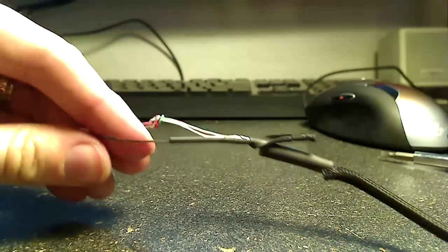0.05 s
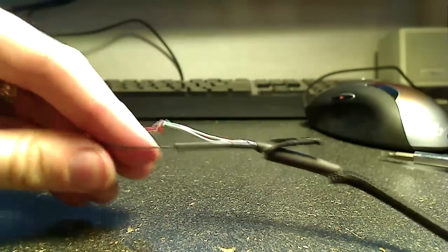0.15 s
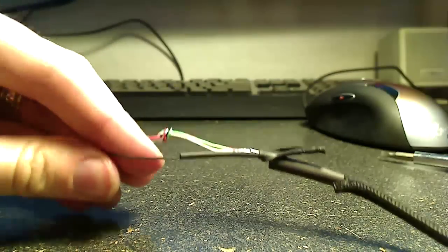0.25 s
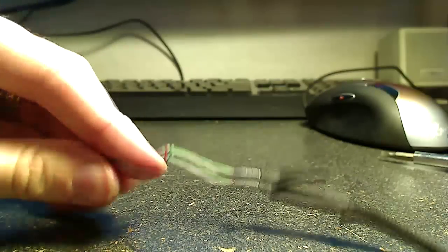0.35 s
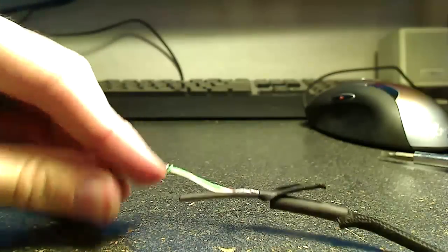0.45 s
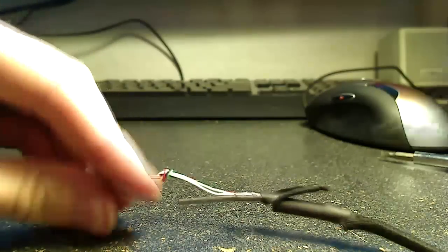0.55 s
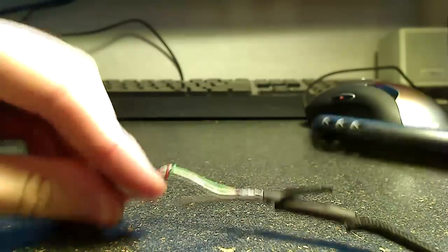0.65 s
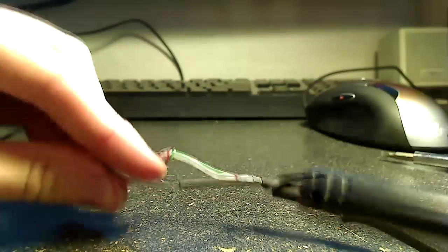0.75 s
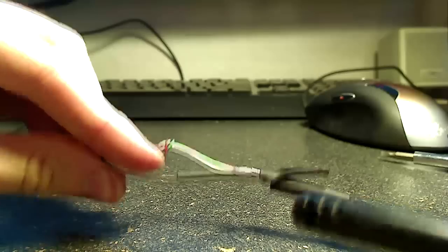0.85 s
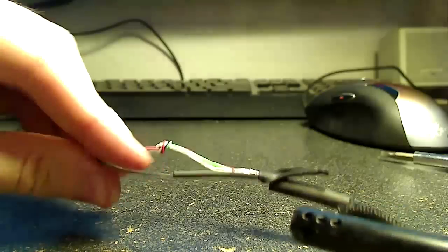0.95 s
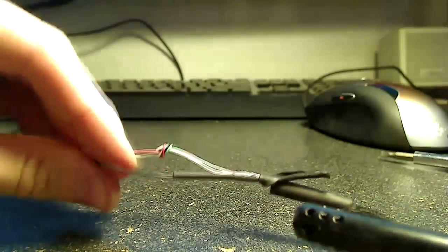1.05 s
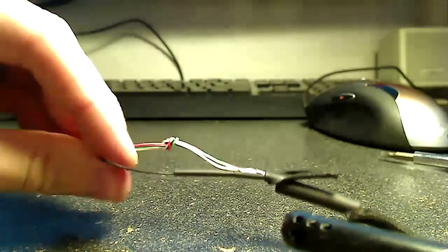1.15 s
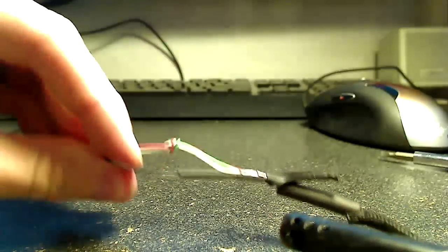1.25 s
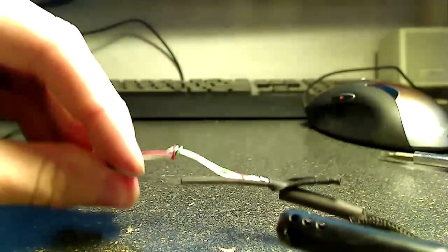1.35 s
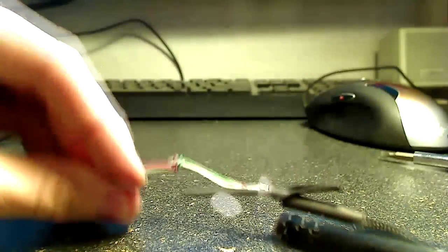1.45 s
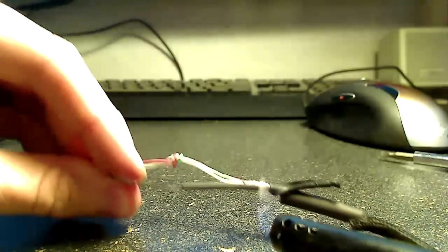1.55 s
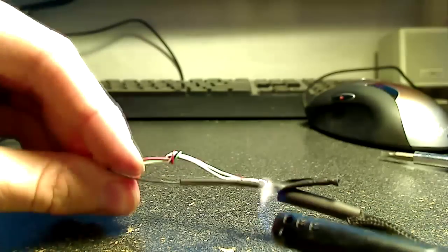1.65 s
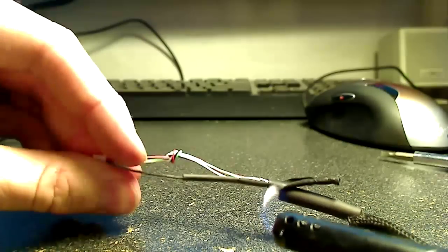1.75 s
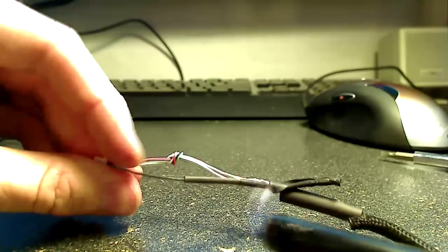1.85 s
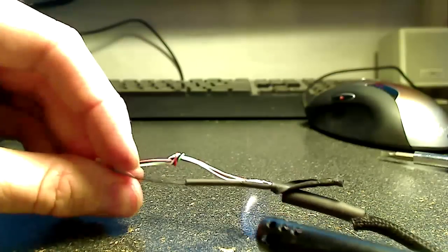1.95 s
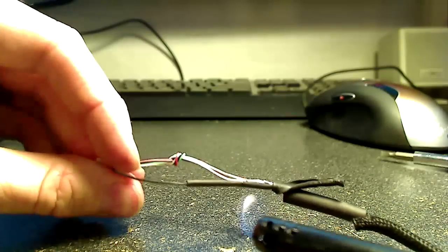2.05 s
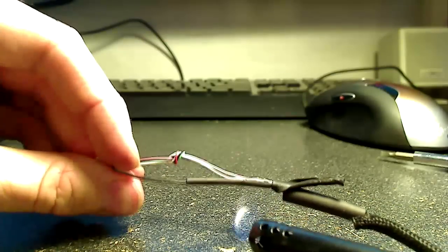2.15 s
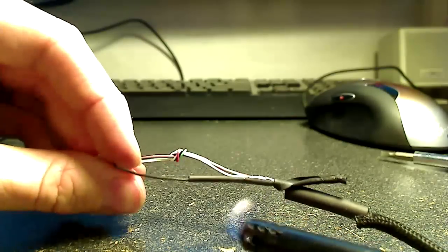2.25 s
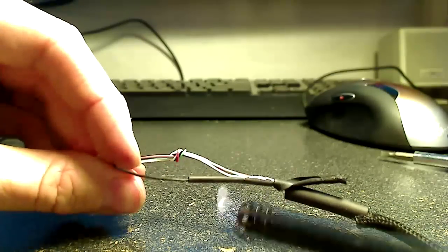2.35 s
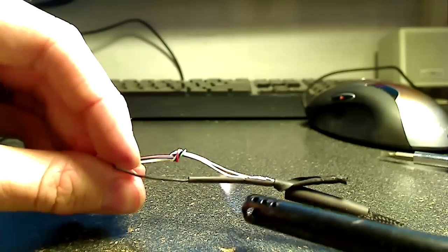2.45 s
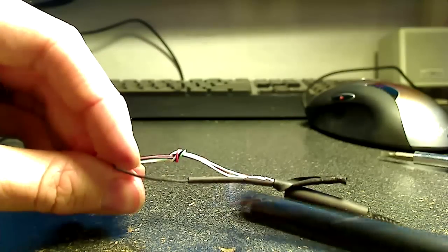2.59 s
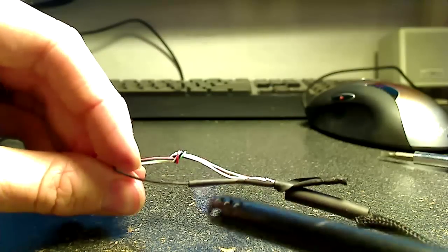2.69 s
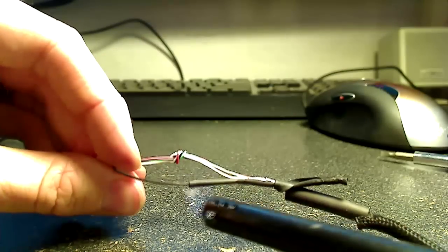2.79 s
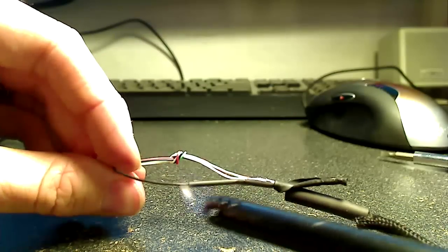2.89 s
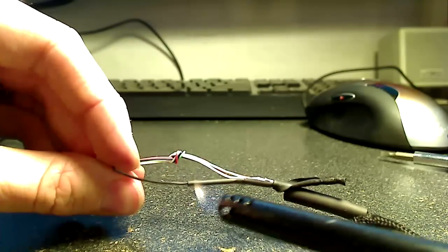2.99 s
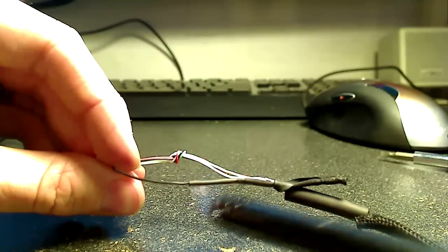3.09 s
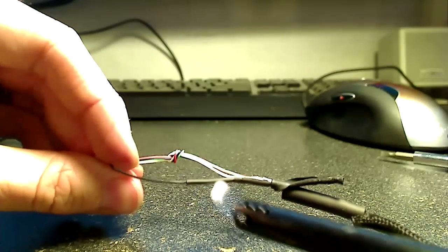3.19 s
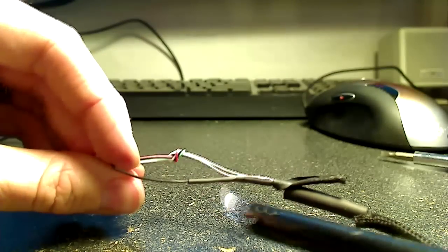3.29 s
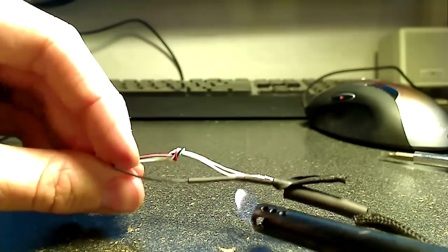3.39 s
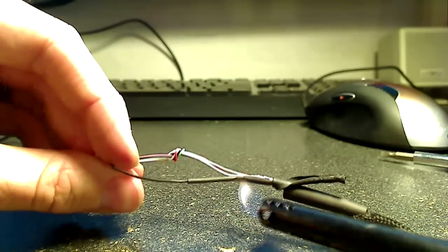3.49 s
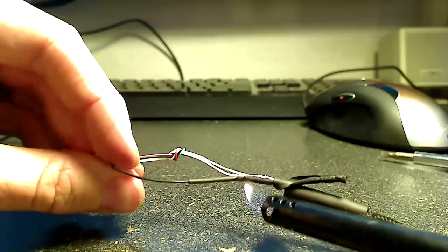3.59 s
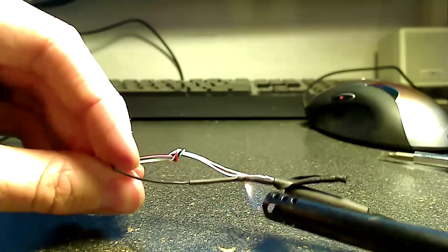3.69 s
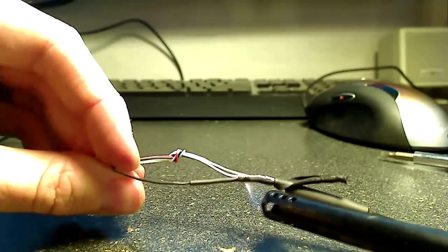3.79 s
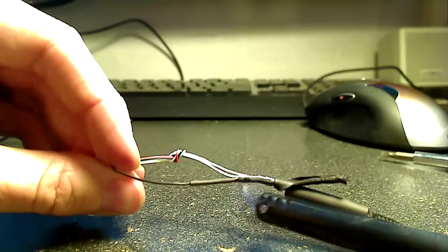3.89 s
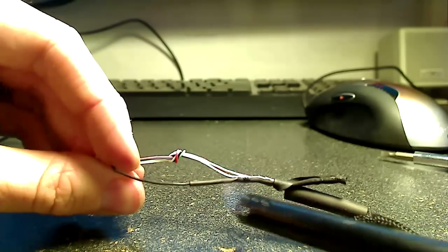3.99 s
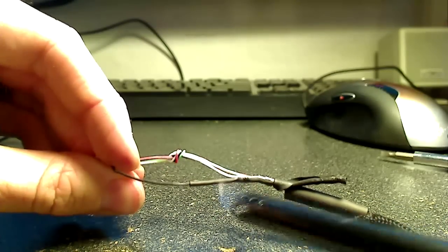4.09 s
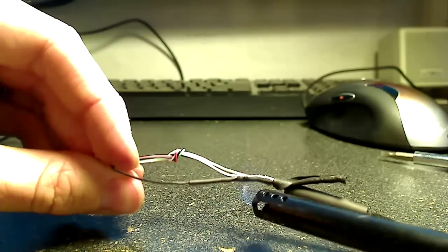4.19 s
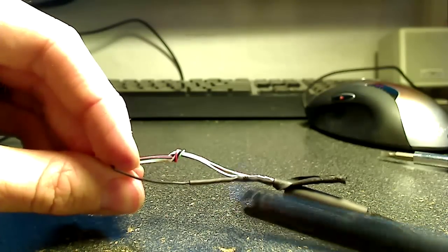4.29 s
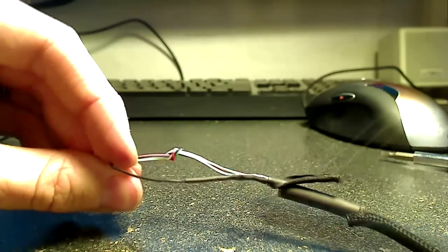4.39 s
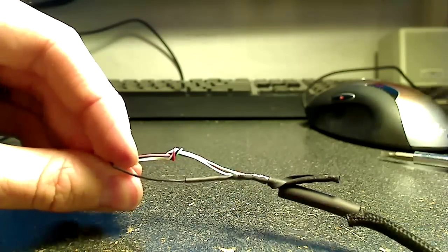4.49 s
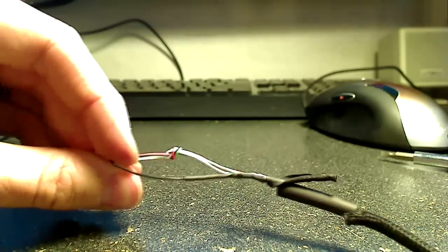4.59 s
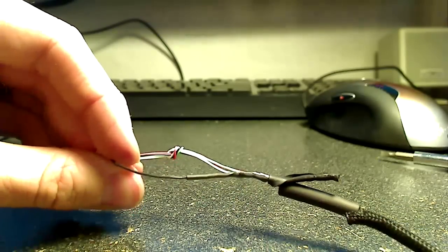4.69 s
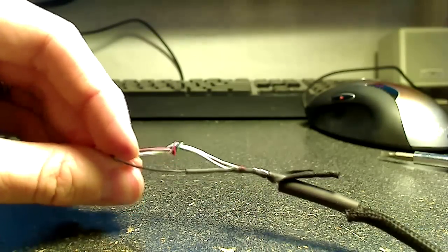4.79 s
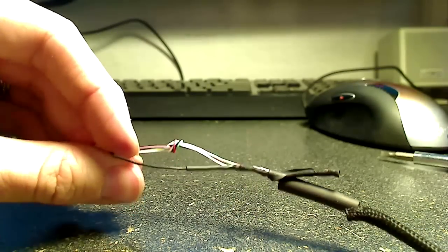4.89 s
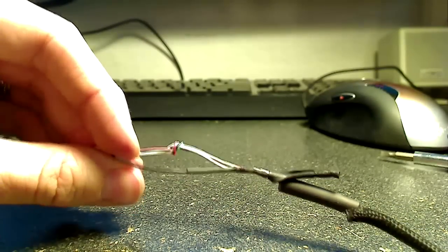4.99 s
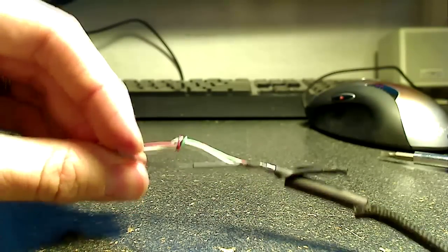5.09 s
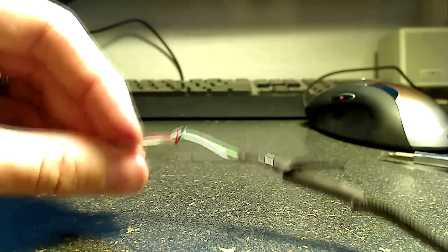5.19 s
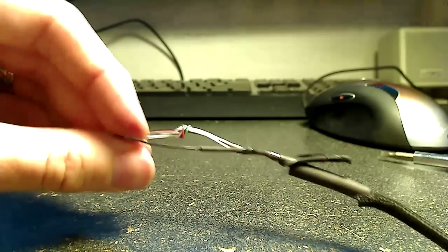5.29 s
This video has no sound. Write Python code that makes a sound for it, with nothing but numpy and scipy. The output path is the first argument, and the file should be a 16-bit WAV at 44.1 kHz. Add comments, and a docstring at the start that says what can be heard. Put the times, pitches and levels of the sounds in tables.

```python
"""A computer hums and whines faintly in a small room, while fingers rub a cable and bump the desk.
Close to a small microphone, a long-necked gas lighter is worked to shrink tubing on the spliced cable.
Its trigger ticks, exciting the modes of the plastic casing; the piezo hammer snaps, ringing the metal
neck, and the gas catches with a low puff. Later the trigger springs back and the lighter is put down:
an impact on the desk, a brief chatter of contacts and a squeak of friction."""
import sys
import numpy as np
from scipy import signal
from scipy.fft import rfft, irfft
from scipy.io import wavfile
from scipy.ndimage import uniform_filter1d, map_coordinates

SR = 44100
rng = np.random.default_rng(int(sys.argv[2]) if len(sys.argv) > 2 else 0)


def bounce(signal):
    """Save signal as a 16-bit WAV file at the path given by the first command-line argument."""
    frames = np.transpose(np.atleast_2d(signal))
    limited = np.clip(frames, -1, 1)
    pcm = np.round(limited * 32767).astype(np.int16)
    wavfile.write(sys.argv[1], SR, pcm)


N = 235708
SIZE = 16384  # samples in one short sound
AGE = np.arange(SIZE) / SR  # its time axis in seconds
HZ = np.fft.rfftfreq(SIZE, 1 / SR)

# Reverberation of the room. Each row: frequency in Hz, time to decay by 60 dB in seconds.
ROOM_DECAY = [(100, 0.11), (300, 0.1), (1000, 0.11), (3000, 0.12), (6000, 0.13), (10000, 0.1),
              (16000, 0.099)]
# Electronic tones. Each row: frequency in Hz, level in dB, half the depth of the dips as a fraction.
WHINES = [(1830, -81.5, .3), (3658, -91, .35), (4732, -96.5, .3), (6070, -103, .3), (7101, -101, .3),
          (7321, -94, .45), (9152, -104, .3), (9475, -101, .3), (10982, -104, .3), (11838, -102, .3)]

# Spectral envelopes. Each row: frequency in Hz, relative level in dB.
FAN_SPECTRUM = [(20, -44.5), (60, -23.5), (125, -9), (240, -5.5), (320, -12.5), (440, -14), (540, -13.5),
                (1000, -22), (1500, -27), (2950, -33), (3400, -36), (6000, -42), (12000, -45.5),
                (14000, -59)]
DESK_SPECTRUM = [(30, -26), (70, -9), (130, -2), (220, 2.5), (290, -5.5), (360, -20), (480, -18),
                 (800, -31.5), (2000, -72.5)]
RUB_SPECTRUM = [(600, -45), (1400, -24), (2050, -6), (2500, -9), (2950, 3), (3600, -11), (5200, -9),
                (6150, -4), (7000, -14), (8200, -18), (9500, -8), (10800, -18), (13000, -22), (16000, -27)]  # the casing under a finger
SCRAPE_SPECTRUM = [(88, -59), (150, -18), (391, -2), (466, 1), (774, -8), (960, -2.5), (1500, -23),
                   (2060, -6), (2920, -35), (3700, -3.5), (4320, -25), (6020, -10), (16000, -49)]  # the lighter sliding on the desk
KNOCK_SPECTRUM = [(90, -26), (200, -18), (420, -3), (560, 0), (950, 1), (1400, -8.5), (2000, -10),
                  (2500, -0.5), (3100, -7.5), (4700, -17.5), (6140, -18), (8900, -21.5), (11000, -30),
                  (16000, -36.5)]  # the lighter striking the desk
FLAME_SPECTRUM = [(30, -28.5), (70, -12), (115, -4), (150, -3), (190, -1), (260, -4.5), (340, -13.5),
                  (490, -12.5), (800, -31), (2000, -47)]
TICK_SPECTRUM = [(300, -48.5), (800, -22), (1370, -10.5), (1750, -6), (2120, 0.5), (2540, -6), (2950, 3),
                 (3600, -10), (4500, -8), (5800, -7), (7100, -17), (9600, -15.5), (13400, -25),
                 (16000, -30)]
SNAP_SPECTRUM = [(200, -34.5), (400, -17), (600, -12), (950, -0.5), (1250, -13), (1750, -9), (2070, 0.5),
                 (2400, -4.5), (3290, 1), (4160, -5.5), (4830, -2.5), (7200, -9.5), (8800, -5.5),
                 (16000, -14.5)]

# Normal modes. Each row: frequency in Hz, relative level in dB, time to decay by 60 dB in seconds.
KNOCK_MODES = [(570, -12, .055), (668, -31, .09), (765, -27, .12), (920, -23, .05), (1660, -27, .05),
               (2050, -26, .04), (2560, -15, .02), (3050, -27, .07), (3700, -29, .07), (6150, -26, .05),
               (8880, -27, .02)]  # the lighter against the desk top
PLASTIC_MODES = [(1570, -25, .03), (2030, -18, .04), (2250, -21, .03), (2900, -20, .05), (3100, -24, .06),
                 (5750, -28, .025), (6150, -30, .035), (9600, -36, .035)]
METAL_MODES = [(2030, -27, .05), (2700, -31, .05), (3130, -28, .06), (3530, -29, .07), (3800, -30, .07),
               (4780, -29, .06), (5100, -27, .06), (5570, -31, .07), (8520, -29, .05), (9690, -32, .07),
               (10400, -33, .06)]  # striker and neck

# Firm pushes on the desk. Each row: middle in seconds, level in dB, pitch in Hz, half-width in seconds.
FIRM_BUMPS = [(0.813, -50.5, 146.8, 0.0097), (1.087, -49.5, 250, 0.017), (1.285, -54, 250, 0.021),
              (1.694, -56.5, 240, 0.027), (2.4, -56.5, 245, 0.028), (2.876, -51, 187.7, 0.0067),
              (3.199, -60, 252.6, 0.091), (3.593, -57, 218, 0.026), (3.739, -60.5, 195.4, .036),
              (4.38, -43.5, 290, 0.0062), (4.799, -51, 256, 0.028), (5.18, -54, 290, 0.023)]
# Finger strokes. Each row: middle in seconds, level in dB, half-width in seconds, treble in dB.
FINGER_STROKES = [(.041, -68.5, 0.025, -27), (.4535, -55, .008, -3), (0.477, -57.5, .009, 32),
                  (0.778, -53, 0.042, -12), (0.896, -56.5, 0.027, -10), (1.017, -49, 0.0055, 0),
                  (2.591, -63, .009, -18), (2.735, -66, .009, -55), (3.849, -72.5, 0.038, -54),
                  (4.317, -52.5, 0.029, -26), (4.527, -65.5, 0.011, 11.5), (4.623, -54.5, 0.0077, 11),
                  (4.652, -61.5, 0.024, -20)]
# Trigger steps. Each row: start in seconds, then catch level, release level, treble and hollowness in dB.
TRIGGER_STEPS = [(.6345, -51, -37.5, -20, -6.5), (0.7399, -57, -40, 4.5, -12),
                 (0.8694, -53.5, -37.5, 6, -3), (0.9554, -39, -40, -6, -11),
                 (1.0177, -49.5, -46.5, -0.5, 0.5), (1.0750, -36.5, -43.5, -3, -2),
                 (1.1938, -32, -37.5, 1.5, 5.5), (1.2637, -45.5, -39, 3.5, -2.5),
                 (1.3142, -36.5, -73, -4, -8), (1.3642, -34, -51, 5.5, -9), (1.4724, -37, -51.5, 0, -4.5),
                 (1.9381, -33.5, -42.5, 4, 5), (3.3399, -32, -33.5, 5.5, 8.5),
                 (4.2822, -33, -40.5, 1, -0.5), (4.3498, -26, -17.5, 6, 10.5), (4.629, -59, -49, 7, -16)]
# Impacts. Each row: start in seconds, level in dB, treble in dB, hollowness in dB.
LANDING_HITS = [(4.9472, -17, 12.5, 6), (4.9495, -26, 3.5, -10.5)]  # handle and neck meet the desk
HAMMER_HITS = [(1.4951, -7.5, 6.5, 1.5), (1.4977, -11.5, -.5, 3)]  # the piezo hammer hits and rebounds


def amp(db):
    """Decibels to amplitude ratio."""
    return 10 ** (np.asarray(db) / 20)


def unit_rms(x):
    """Power normalisation to rms 1."""
    return x / np.sqrt(np.mean(x ** 2) + 1e-20)


def unit_pulse(x):
    """Energy normalisation to that of two milliseconds at rms 1."""
    return x / np.sqrt(np.sum(x ** 2) / (SR * .002))


def curve(points, hz=HZ):
    """Interpolation of (Hz, value) points on a logarithmic frequency axis."""
    frequencies, values = np.transpose(points)
    return np.interp(np.log(hz + 1), np.log(frequencies + 1), values)


def add(track, start_s, sound):
    """Superposition of a sound on the track."""
    start = round(start_s * SR)
    part = sound[max(-start, 0):N - start]
    track[max(start, 0):][:len(part)] += part


def jitter(samples):
    """Low-pass noise at rms 1, from a moving average."""
    return unit_rms(uniform_filter1d(rng.standard_normal(SIZE), size=samples))


def wander(position, knots=64):
    """Smooth fluctuation, from a spline through random values."""
    return map_coordinates(rng.standard_normal(size=knots), [position], mode="mirror")


def swell(width_s):
    """A Gaussian envelope centred in a short sound."""
    return np.exp(-2 * ((AGE - AGE.mean()) / width_s) ** 2)


def coloured(x, gain_db):
    """Minimum-phase filtering: folding the cepstrum makes the response causal."""
    cepstrum = irfft(np.log(amp(gain_db) + 1e-6))
    cepstrum[1:SIZE // 2] *= 2
    cepstrum[SIZE // 2 + 1:] = 0
    return irfft(rfft(x) * np.exp(rfft(cepstrum)))


def treble(db, corner_hz=2500, top_hz=11000):
    """Spectral tilt: harder contacts are brighter, by about db per two octaves above the corner."""
    return db * np.log2(1 + (np.minimum(HZ, top_hz) / corner_hz) ** 4) / 8


def hollow(db, middle_hz=1500, octaves=.52):
    """Broad resonance of the hollow handle, stronger in a loose grip."""
    return db * np.exp(-(np.log2((HZ + 1) / middle_hz) / octaves) ** 2)


def burst(length_s, rise_s=.001):
    """Scattering among nearby things spreads a contact into brief noise of fairly even spectrum."""
    gate = np.exp(-np.minimum(AGE / length_s, 10) ** 2) * (1 - np.exp(-AGE / rise_s))
    scatter = rfft(rng.standard_normal(SIZE) * gate)
    flattened = scatter / np.sqrt(np.abs(scatter) + 1e-12)
    return irfft(flattened) * np.sqrt(gate)


def ring(modes, scatter_db=3, detune=.008, buzz=.007, attack_s=.00012):
    """Damped modes: the grip shifts their strength and pitch, and loose parts roughen them."""
    waves = np.zeros(SIZE)
    for hz, db, t60 in modes:
        rattle = jitter(50)
        pitch = hz * (1 + detune * rng.normal() + buzz * rattle)
        decay = amp(db + scatter_db * rng.normal() - 60 * AGE / t60)
        waves += decay * np.sin(2 * np.pi * (np.cumsum(pitch) / SR + rng.random()))
    return waves * (1 - np.exp(-(AGE / attack_s) ** 2))


def room(x, echo_db, tail_db, echo_s=.0069, smear_s=.0019, build_s=.0088):
    """Reverberation: one smeared early reflection and a diffuse tail follow the direct sound."""
    hz, t, noise = signal.stft(rng.standard_normal(SIZE), SR, nperseg=256)
    decay = amp(-60 * t / curve(ROOM_DECAY, hz)[:, None])
    tail = signal.istft(noise * decay, SR, nperseg=256)[1][:SIZE]
    tail *= 1 - np.exp(-AGE / build_s)
    echo = np.interp(AGE - echo_s, AGE, burst(smear_s), left=0)
    response = amp(tail_db) * tail / np.linalg.norm(tail) + amp(echo_db) * echo / np.linalg.norm(echo)
    return x + signal.fftconvolve(x, response)[:SIZE]


def friction(colour_db, db, width_s, grain_db=5, grip_db=2):
    """Stick-slip friction: tiny slips make grainy noise, and each grip favours other resonances."""
    grain = amp(grain_db * jitter(60))
    grip = grip_db * wander(HZ / 400)
    slips = coloured(rng.standard_normal(SIZE) * grain, colour_db + grip)
    return amp(db) * swell(width_s) * unit_rms(slips)


def thud():
    """Impulse response of the desk's low resonances."""
    return unit_pulse(coloured(AGE == 0, curve(DESK_SPECTRUM)))


def impacts(hits, spectrum, modes, length_s, low_hz, ring_db, thud_db, echo_db, tail_db):
    """Impacts crack, shake the desk and ring a body too small to radiate well below low_hz."""
    track = np.zeros(N)
    radiation_db = -10 * np.log10(1 + (low_hz / (HZ + 1)) ** 4)
    for start_s, db, treble_db, hollow_db in hits:
        crack = unit_pulse(coloured(burst(length_s), curve(spectrum)))
        colour_db = treble(treble_db) + hollow(hollow_db) + radiation_db
        body = unit_pulse(coloured(crack + amp(ring_db) * ring(modes), colour_db))
        add(track, start_s, amp(db) * room(body + amp(thud_db) * thud(), echo_db, tail_db))
    return track


def computer(fan_db=-68, pulse_hz=24):
    """Broadband fan noise, and electronic whines that dip together by amplitude modulation."""
    t = np.arange(N) / SR
    fan_gain = amp(curve(FAN_SPECTRUM, np.fft.rfftfreq(N, 1 / SR)))
    fan = irfft(rfft(rng.standard_normal(N)) * fan_gain, N)
    track = amp(fan_db) * unit_rms(fan)
    dips = 2 * np.sin(np.pi * pulse_hz * t) ** 6
    for hz, db, half_depth in WHINES:
        pitch = hz + wander(t * 10, knots=128)
        tone = np.sin(2 * np.pi * np.cumsum(pitch) / SR)
        track += amp(db) * unit_rms((1 - half_depth * dips) * tone)
    return track


def finger_rubs():
    """Sliding friction of fingers on the casing and the cable."""
    track = np.zeros(N)
    for middle_s, db, width_s, treble_db in FINGER_STROKES:
        rub = friction(curve(RUB_SPECTRUM) + treble(treble_db), db, width_s)
        add(track, middle_s - AGE.mean(), rub)
    return track


def hand_bumps(waver=.04, count=22, light_db=-63, scatter_db=3, light_hz=(125.2, 275), light_s=.03):
    """Soft pushes drive the desk's low resonances; light ones fall at random among the firm ones."""
    track = np.zeros(N)
    light_bumps = [((k + rng.random()) * N / SR / count, light_db + scatter_db * rng.normal(),
                    rng.uniform(*light_hz), light_s) for k in range(count)]
    for middle_s, db, hz, width_s in FIRM_BUMPS + light_bumps:
        pitch = hz * (1 + waver * wander(AGE * 110))
        tone = np.sin(2 * np.pi * np.cumsum(pitch) / SR)
        add(track, middle_s - AGE.mean(), amp(db) * swell(width_s) * tone)
    return track


def neck_squeak(start_s=5.092, db=-46, hz=6030, waver=.012, rough_db=4, rise_s=.01):
    """Friction-driven vibration: the metal neck squeaks unevenly as it skids on the desk."""
    pitch = hz * (1 + waver * jitter(120))
    grip = unit_rms(amp(rough_db * jitter(120)))
    envelope = AGE / rise_s * np.exp(1 - AGE / rise_s) * grip
    track = np.zeros(N)
    add(track, start_s, amp(db) * envelope * np.sin(2 * np.pi * np.cumsum(pitch) / SR))
    return track


def skid(start_s=5.0755, gap_s=.0095, peak_s=5.099, width_s=.045, peak_db=-35, fade_db=6, hollow_db=5):
    """Repeated impacts, each brighter, and sliding friction bring the lighter to rest."""
    hits = []
    for k in range(5):
        hit_s = start_s + k * gap_s
        db = peak_db - fade_db * ((hit_s - peak_s) / width_s) ** 2
        treble_db = -12 + 7 * k
        hits.append((hit_s, db, treble_db, hollow_db))
    track = impacts(hits, KNOCK_SPECTRUM, KNOCK_MODES, length_s=.0088, low_hz=297,
                    ring_db=1.5, thud_db=-23, echo_db=-17.5, tail_db=-18)
    scrape_db = curve(SCRAPE_SPECTRUM)
    add(track, peak_s - AGE.mean(), friction(scrape_db, db=-45, width_s=.029))
    add(track, peak_s + width_s - AGE.mean(), friction(scrape_db + treble(-6), db=-51, width_s=.017))
    return track


def landing():
    """Temporal fusion: handle and neck strike the desk so close together that one knock is heard."""
    return impacts(LANDING_HITS, KNOCK_SPECTRUM, KNOCK_MODES, length_s=.0066, low_hz=329,
                   ring_db=9, thud_db=-42, echo_db=-23, tail_db=-10)


def trigger_slides(lead_s=.003, db=-58):
    """Sliding friction of the trigger just before each catch."""
    track = np.zeros(N)
    colour_db = curve(RUB_SPECTRUM) + treble(-8, corner_hz=3800, top_hz=14000)
    for catch_s, *_ in TRIGGER_STEPS:
        add(track, catch_s - lead_s - AGE.mean(), friction(colour_db, db, width_s=.0036))
    return track


def trigger_ticks(release_s=.0076):
    """Stick-slip motion: each step excites the casing twice, as the trigger catches and lets go."""
    hits = []
    for start_s, catch_db, release_db, treble_db, hollow_db in TRIGGER_STEPS:
        hits.append((start_s, catch_db, treble_db, hollow_db))
        hits.append((start_s + release_s, release_db, treble_db, hollow_db))
    return impacts(hits, TICK_SPECTRUM, PLASTIC_MODES, length_s=.0045, low_hz=900,
                   ring_db=8.5, thud_db=-27.5, echo_db=-16, tail_db=-17.5)


def flame(start_s=1.5, db=-32, peak_s=.024, width_s=.015):
    """Combustion noise: the gas catches with one low puff."""
    envelope = np.exp(-((AGE - peak_s) / width_s) ** 2)
    puff = coloured(burst(length_s=.24) * envelope, curve(FLAME_SPECTRUM))
    track = np.zeros(N)
    add(track, start_s, amp(db) * puff * np.linalg.norm(envelope) / np.linalg.norm(puff))
    return track


def striker(gap_s=.0036, slip_db=-31, growth_db=4, slip_treble_db=-6, jolt_db=-16):
    """Impulsive excitation: the hammer slips ever harder, then snaps, rings the neck and jolts the desk."""
    snap_s = HAMMER_HITS[0][0]
    slips = [(snap_s - (k + 1) * gap_s, slip_db - k * growth_db, slip_treble_db, 0) for k in range(3)]
    track = impacts(slips + HAMMER_HITS, SNAP_SPECTRUM, METAL_MODES, length_s=.0034, low_hz=200.7,
                    ring_db=3, thud_db=-29.5, echo_db=-14, tail_db=-12)
    add(track, snap_s, amp(jolt_db) * room(thud(), echo_db=-15.5, tail_db=-19.5))
    return track


def scene():
    """Superposition of all sources at one microphone."""
    lighting = trigger_slides() + trigger_ticks() + striker() + flame()
    putting_down = landing() + skid() + neck_squeak()
    return (lighting + putting_down + hand_bumps() + finger_rubs() + computer())[None]


def record(dry, ceiling=.55, top_hz=16100):
    """Saturation in the microphone rounds the loudest peak; its band limit removes the highest treble."""
    rounded = dry / (1 + (dry / ceiling) ** 4) ** (1 / 4)
    return signal.sosfilt(signal.cheby1(12, .5, top_hz, fs=SR, output="sos"), rounded)


dry = scene()
out = record(dry)
bounce(out)
```